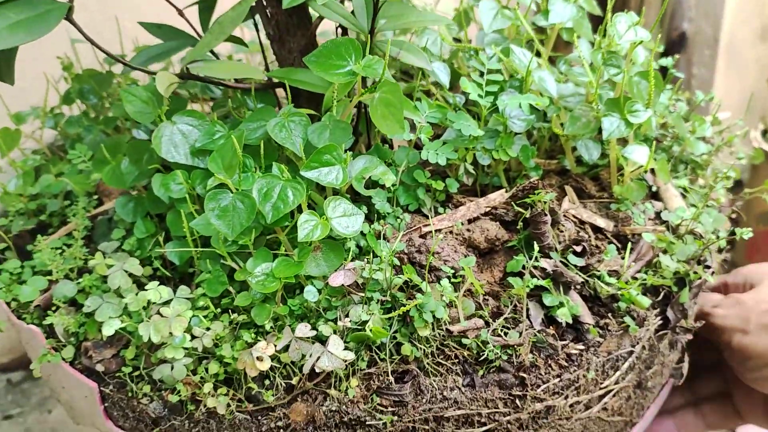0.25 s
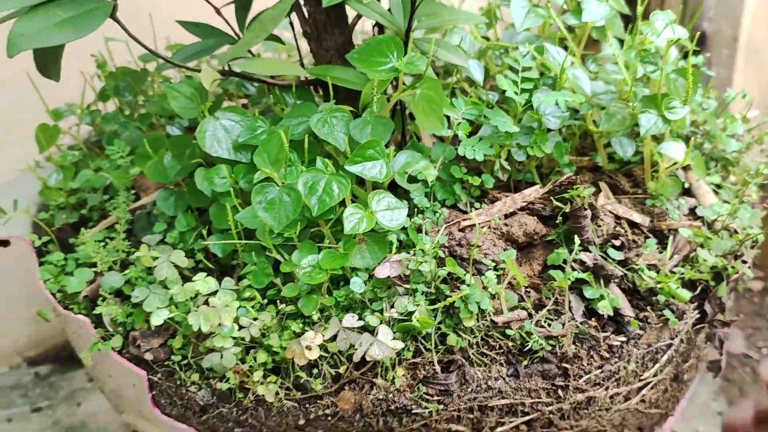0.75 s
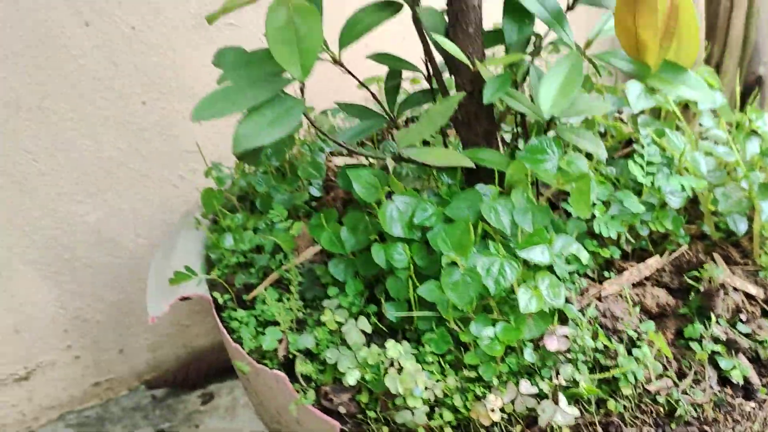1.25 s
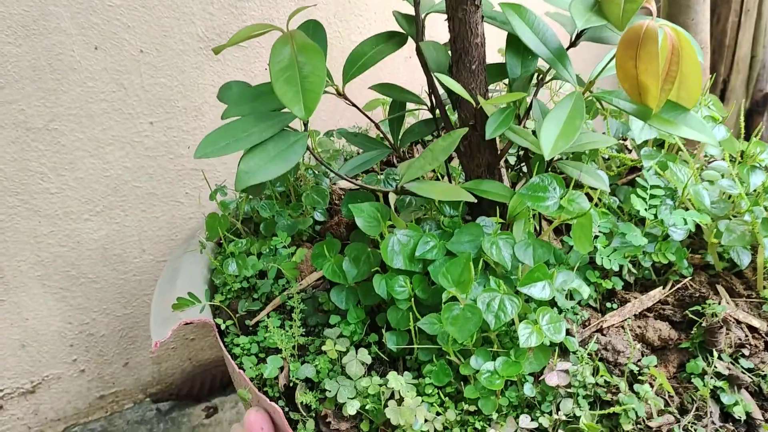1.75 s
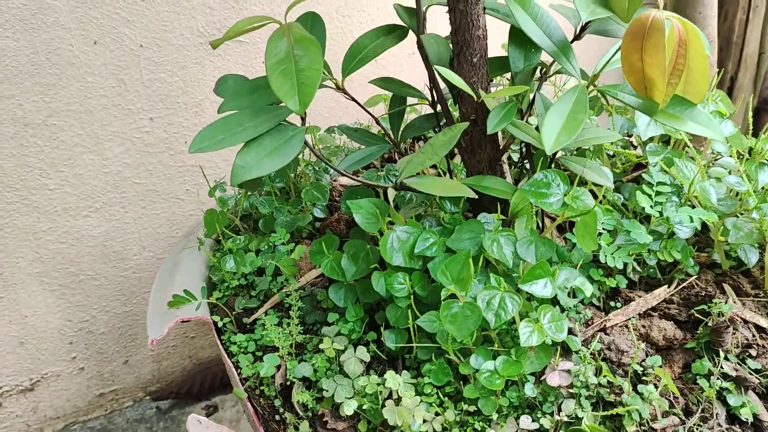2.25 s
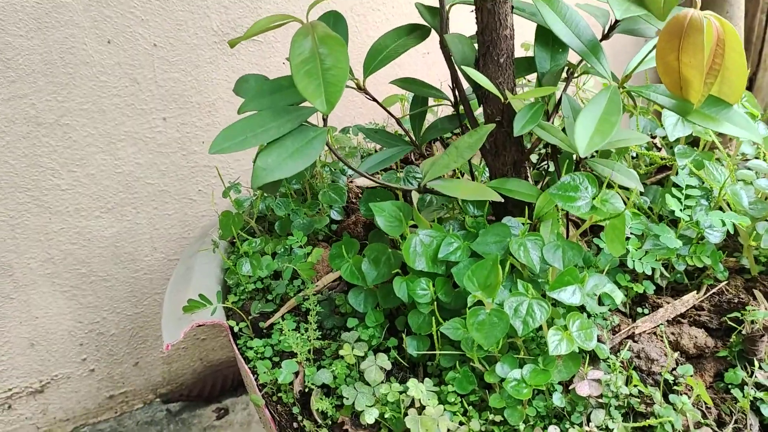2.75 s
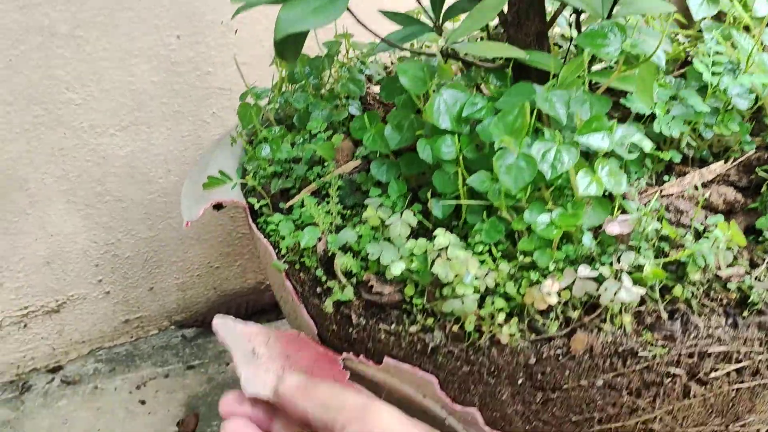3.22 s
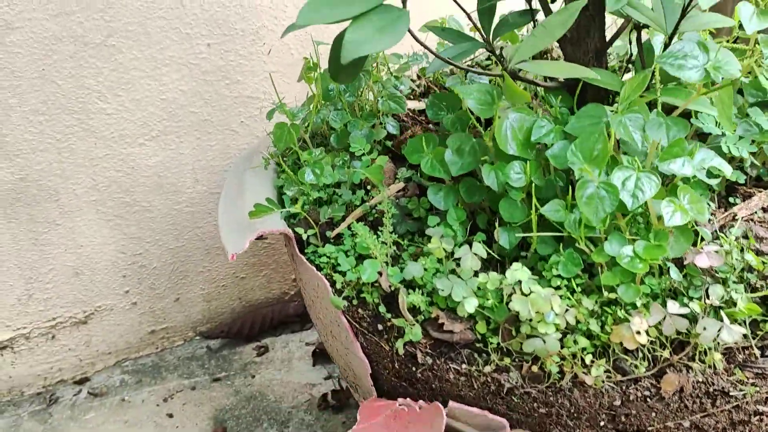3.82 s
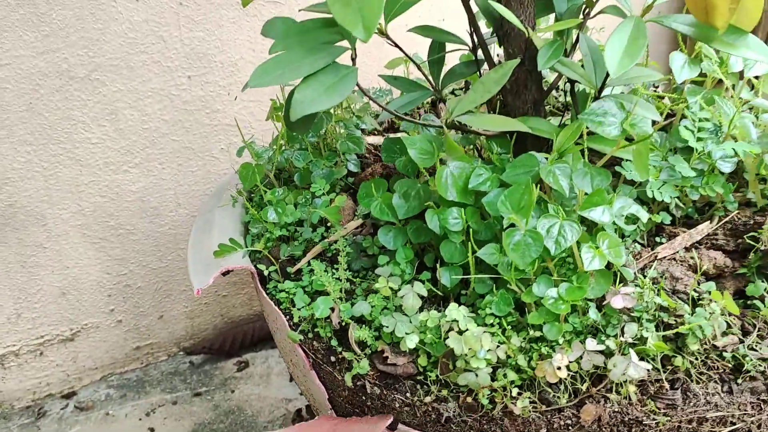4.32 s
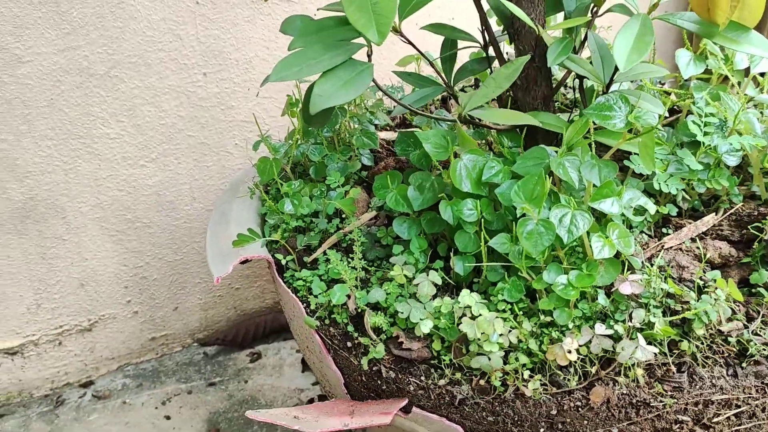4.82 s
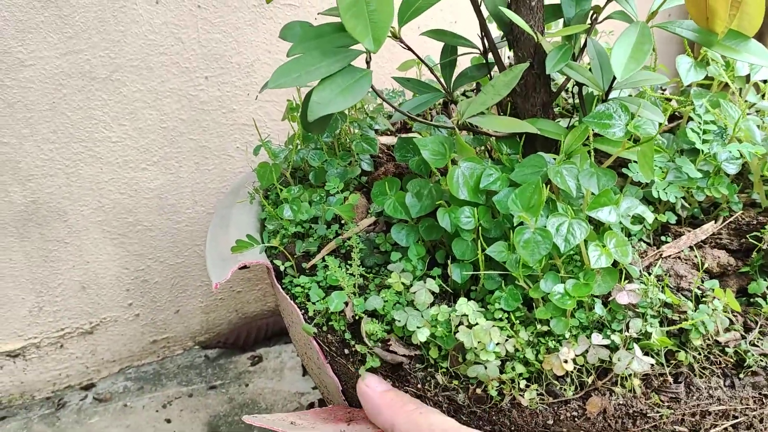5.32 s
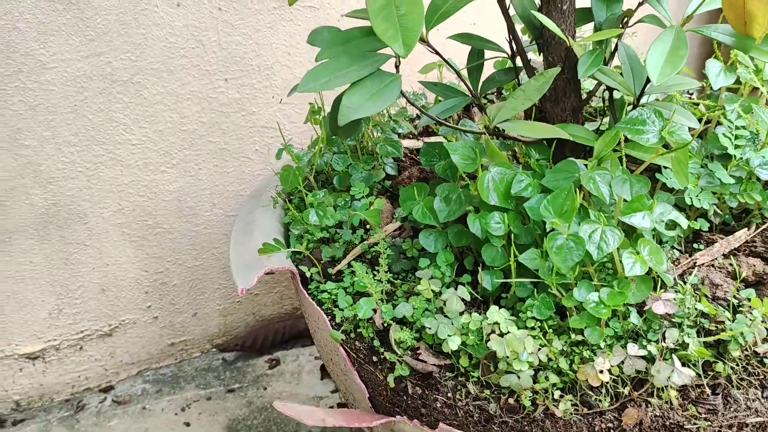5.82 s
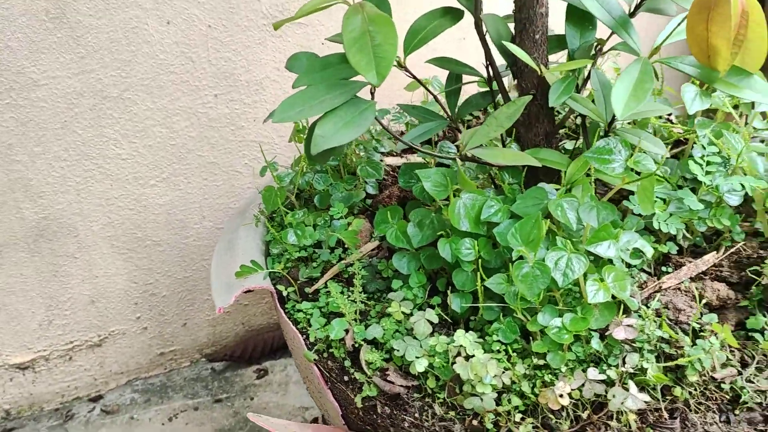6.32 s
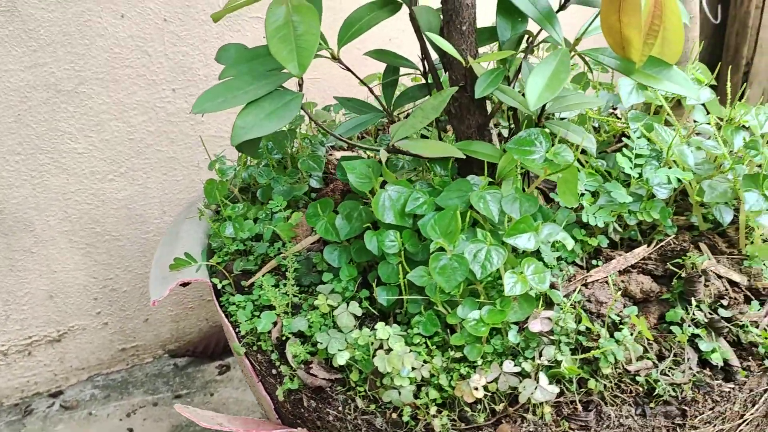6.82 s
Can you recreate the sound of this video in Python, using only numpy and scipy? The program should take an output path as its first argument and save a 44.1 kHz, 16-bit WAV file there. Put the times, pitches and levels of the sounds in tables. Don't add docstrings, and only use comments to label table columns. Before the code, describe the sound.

Quiet outdoor air, a thin cricket shimmer and a very faint sinking engine hum until about 1.6 s, with fingers softly brushing plastic, a dull small knock at 0.76 and high bird chips near 0.5, 0.7, 1.3 and 1.5. At 2.11 the brittle wall gives way: a very loud, ragged volley of dry cracks lasting about 0.06 s, with a scrape and short hollow thuds from the filled pot. A smaller snap follows at 2.55, then scraping. Light rubbing, ticks and knocks cluster at 3.6-4.05. A crisp double crack comes at 4.24, trailed by dragging; then faint handling. At 5.83 one last very loud, tight crack, a brief scrape, then tiny ticks and crumbs to 7 s. Distant roosters are barely audible from 2.3 s; bird chips recur sparsely. Short yard echo.

```python
import sys
import numpy as np
from scipy import signal
from scipy.io import wavfile

SR = 44100
rng = np.random.default_rng(int(sys.argv[2]) if len(sys.argv) > 2 else 0)


def gain_from_db(level_db):
    decades = np.asarray(level_db, float) / 20
    return 10 ** decades


def generate_wav(signal):
    frames = np.transpose(np.atleast_2d(signal))
    scaled = np.clip(frames, -1, 1) * 32767
    pcm = np.round(scaled).astype(np.int16)
    wavfile.write(sys.argv[1], SR, pcm)


N = 311346

# pitch_hz, level_db (per Hz)
AIR_LEVELS = [(15, 4), (82, 2), (151, -6.5), (217, -1.5), (337, -15.5), (555, -12), (1640, -26),
              (2930, -19.5), (4080, -41), (5600, -27), (7720, -30), (11000, -37.5), (15000, -35)]
# pitch_hz, likeness (0 to 1)
AIR_LIKENESS = [(25, 0.4), (80, .9), (250, 0.3), (1000, 0.01), (3000, 0.58), (10000, 0)]
AIR_DB = -60

# start_s, pitch_hz, level_db
ENGINE_HUM = [
    (0.0, 108.2, -74),
    (0.2, 109.2, -62.5),
    (0.42, 104, -67.5),
    (0.76, 104, -60.5),
    (0.9, 105, -67.5),
    (1.02, 95, -78),
    (1.09, 96, -60.5),
    (1.29, 92, -77),
    (1.6, 88, -71),
]
CRICKET_DB = -72.5

# peak_s, peak_db, rise_s, fall_s, dull_part_db
SCRAPES = [(0.0, -59.5, .01, 0.18, 1.5), (0.787, -53.5, 0.077, 0.036, -3),
           (2.164, -20.5, 0.017, .024, -6.5), (2.19, -41, .01, 0.12, 1), (2.36, -77, .1, 0.38, 10.5),
           (2.46, -61.5, 0.076, 0.11, -0.5), (2.563, -44.5, 0.026, 0.068, 2), (2.62, -48, 0.009, 0.012, 0),
           (2.861, -70, 0.063, 0.077, 4.5), (3.07, -73, 0.23, 0.16, 1), (4.258, -47, .01, 0.082, 4.5),
           (4.366, -43, 0.11, 0.038, 0), (4.42, -63, 0.017, 0.37, -3.5), (4.838, -65, 0.037, 0.0087, 5.5),
           (5.528, -53.5, 0.093, 0.12, -2.5), (5.42, -65, 0.13, 0.081, -17),
           (5.672, -60.5, 0.042, 0.072, 0.5), (5.847, -38.5, .01, 0.063, 0.5), (5.93, -60.5, .02, 0.094, 0),
           (6.27, -63.5, 0.16, .12, -9.5), (7.06, -69.5, 0.71, .01, -5.5)]
# peak_s, peak_db, rise_s, fall_s, bright_part_db
BRUSHES = [(0.68, -71.5, .5, 0.28, -20), (1.1, -74.5, 0.28, 0.087, -8), (1.35, -62, 0.19, 0.41, -5.5),
           (1.68, -63, 0.3, 0.18, -6), (1.949, -58, 0.019, 1, -4.5), (2.095, -53.5, 0.02, .006, -7),
           (3.369, -65.5, 0.28, 0.15, -6), (3.695, -47.5, 0.015, .025, -14), (3.757, -34, .02, 0.022, -9),
           (3.805, -47, 0.11, 0.044, -3.5), (3.84, -53, 0.12, 0.036, -7), (3.868, -50.5, .01, 0.06, -5),
           (3.945, -51, 0.031, 0.014, -11), (3.977, -56, 0.021, .012, -13), (4.004, -51, 0.0083, .006, -13),
           (4.04, -57, 0.049, 0.048, -4), (4.15, -67, 0.56, 0.15, -7), (4.92, -56.5, 0.019, 0.055, -5.5),
           (4.951, -53, 0.047, 0.015, -4), (5.168, -61, 0.024, 0.16, -11), (6.055, -59.5, 0.036, 0.032, 5),
           (6.342, -61.5, 0.1, .045, 2.5), (6.536, -61, 0.021, 0.077, -2.5), (6.668, -61, .04, .04, -10.5)]
SCRAPE_BRIGHT_DB, BRUSH_DULL_DB = -8.5, -4
STROKE_BEND = 1.51
REST_DB = -83.5

# start_s, peak_db, die_away_s (to -30 dB)
BIRD_CHIPS = [
    (0.5037, -42, 0.14),
    (0.7356, -44, 0.17),
    (1.265, -46, 0.39),
    (1.4894, -49, 0.16),
    (2.3521, -44, 0.26),
    (2.8998, -40.5, 0.11),
    (4.592, -44, 0.1),
    (5.3332, -45.5, 0.088),
    (6.1888, -52, 0.14),
]

# share_of_shard_pitch, level_db, die_away_s (to -60 dB)
SHARD_MODES = [(.5, -20, .009), (.7, -9, .009), (.84, -3, .009), (.93, -1, .01), (1.0, 0, .01),
               (1.1, -1, .009), (1.24, -4, .008), (1.45, -8, .007), (1.75, -12, .006)]
# share_of_thud_pitch, level_db, die_away_s (to -60 dB)
THUD_MODES = [(.5, -11, 0.03), (.87, -13, 0.038), (1.002, 8.5, 0.033), (1.14, -2.5, 0.028),
              (1.36, -3.5, .03), (1.629, -10, 0.022)]
# start_s, peak_db, thud_db (compared with peak), thud_hz, shard_hz
BREAKS = [(2.1085, -27.5, -13, 620, 3670), (2.1141, -14, -28, 860, 3460), (2.1156, 0.5, -15.5, 560, 2690),
          (2.1297, -8, -10, 573, 3940), (2.1312, 1, -14, 565, 2580), (2.1338, -6, -21, 1000, 2670),
          (2.1432, -11.5, -10, 877, 2920), (2.1447, -3.5, -11.5, 934, 2400), (2.155, -9, -9.5, 1000, 2437),
          (2.1584, -10, -13, 555, 3100), (2.166, -5, -20, 1143, 4700), (2.168, -7, -7, 562, 1488),
          (2.5466, -31, -17.5, 600, 2620), (2.547, -18, -15, 500, 5000), (2.5475, -8.5, -7, 934, 2390),
          (2.5492, -13.5, -4, 243.5, 3300), (4.2364, -30, -14, 600, 2600), (4.2387, -10, -5.5, 580, 2200),
          (4.2405, -8, -14, 590, 3320), (5.8291, -0.5, -20, 800, 2500), (5.8305, 0, -11, 597, 2970),
          (5.8327, -7.5, -9, 320, 3200)]
# start_s, peak_db, thud_db (compared with peak), thud_hz
KNOCKS = [(0.7614, -38, 4, 597), (0.7663, -36, -0.5, 580), (1.374, -42, -7, 900), (1.5944, -47.5, 3, 1040),
          (1.9463, -49, -3, 920), (2.2455, -32.5, -3, 895), (2.449, -43.5, -2, 550),
          (2.599, -36, -1.5, 920), (3.687, -25, -16, 600), (4.0111, -18, -11.5, 618),
          (4.7252, -51, -9.5, 1062), (4.807, -48.5, 3.5, 510), (4.8348, -53, -7, 794),
          (4.9222, -44, -13.5, 930), (5.5238, -39, 1.5, 740), (5.6014, -40, -22, 724),
          (6.4954, -40, -10, 950), (6.6362, -40, -12.5, 614)]
# start_s, peak_db, crack_db (compared with peak), shard_hz
TICKS = [(1.135, -44, -23, 2110), (1.4291, -41, 6, 3110), (2.5485, -17, -7.5, 5130),
         (2.6188, -28.5, -20, 1910), (3.6194, -39.5, 2.5, 2270), (3.728, -23, -7, 3100),
         (3.7444, -30, 6, 2150), (3.758, -21, 8, 2170), (3.8177, -39, 20, 3450), (3.8556, -35.5, 8, 3360),
         (3.943, -34, -21, 2730), (3.9648, -26.5, -1, 2400), (4.0364, -47, 7, 3290), (4.549, -45, 1, 3170),
         (5.8128, -41.5, -7, 2830), (6.527, -47.5, 15.5, 3900), (6.6607, -40.5, 5, 2110),
         (6.745, -47, 4, 2400), (6.7005, -57, 10, 4200), (6.7705, -48.5, 3.5, 3020),
         (6.8152, -50.5, 11, 2360)]
BREAK_CRACK_DB, CRACK_DB_PER_OCTAVE, MEAN_SHARD_HZ = -8, -2, 2560
KNOCK_CRACK_DB, KNOCK_SHARD_HZ = -11, 2400
TICK_THUD_DB, TICK_THUD_HZ = -12.5, 590
THUD_LATE_S = 0.00209
LEFT_TURN_HZ, RIGHT_TURN_HZ = 1500, 9500

# pitch_hz, level_db, die_away_s (to -60 dB)
YARD_ECHO = [(213, -33, 0.23), (480, -25, 0.11), (1000, -38, 0.17), (2200, -13, 0.05), (4770, -32, 0.058),
             (9000, -24.5, .09)]

# start_s, length_s, first_hz, last_hz, level_db
ROOSTER_NOTES = [(2.279, .3, 1325, 1335, -73.5), (2.945, 0.24, 1083, 1180, -74),
                 (3.187, .06, 1150, 1073, -71.5), (3.253, 0.26, 1053, 1155, -71),
                 (3.526, 0.14, 1150, 1046, -70), (3.53, .1, 1710, 1680, -76.5),
                 (4.249, .45, 1567, 1560, -75), (4.681, .13, 1056, 1050, -74), (5.58, .15, 1700, 1625, -79),
                 (6.109, .11, 1140, 1095, -74), (6.268, .39, 1637, 1650, -70.5),
                 (6.697, .34, 1615, 1600, -78.5)]
ROOSTER_SPLIT_HZ = 1250


def rms_one(x):
    return x / np.sqrt(np.mean(x ** 2) + 1e-20)


def peak_one(x):
    return x / np.max(np.abs(x))


def in_time(rows):
    s, *columns = np.transpose(rows)
    return [np.interp(np.arange(N) / SR, s, c) for c in columns]


def band(x, low_hz, high_hz, order=2):
    return signal.sosfilt(signal.butter(order, [low_hz, high_hz], "band", fs=SR, output="sos"), x)


def drift(rate_hz):
    r = np.exp(-80 * np.pi * rate_hz / SR)
    noise = rng.standard_normal(N // 40 + 2002)
    slow = signal.lfilter([1], [1, -2 * r, r * r], noise)[2000:]
    return np.interp(np.arange(N) / 40, np.arange(len(slow)), rms_one(slow))


def ring(clicks, hz, die_away_s):
    r = gain_from_db(-60 / (die_away_s * SR))
    w = 2 * np.pi * hz / SR
    return signal.lfilter([0, np.sin(w)], [1, -2 * r * np.cos(w), r * r], clicks + 1e-18)


def ring_modes(push, modes, base_hz):
    tones = [gain_from_db(db) * peak_one(ring(push, share * base_hz, die_away_s)) for share, db, die_away_s in modes]
    return peak_one(sum(tones))


def turn(x, hz):
    bend = np.tan(np.pi * hz / SR)
    pole = (bend - 1) / (bend + 1)
    return signal.lfilter([pole, 1], [1, pole], x)


def ports(x, own, pan_db):
    shared = np.array([turn(x, LEFT_TURN_HZ), turn(x, RIGHT_TURN_HZ)])
    return (shared + own) * gain_from_db([[pan_db / 2], [-pan_db / 2]])


def far_tone(rows, rough, fade_s):
    t = np.arange(N) / SR
    hz, db = in_time(rows)
    gate = np.clip(np.minimum(t - rows[0][0], rows[-1][0] - t) / fade_s, 0, 1)
    phase = 2 * np.pi * np.cumsum(hz) / SR
    both = []
    for port in range(2):
        level = np.sqrt(2) * gate * gain_from_db(db + 1.9 * drift(34))
        both.append(level * np.sin(phase + rough * drift(3.7)))
    return np.array(both)


def air(patchy_db):
    out = 0
    edges = 18 * 2 ** np.arange(0, 10.1, .5)
    white = rng.standard_normal((2, 2, N))
    for k, (low, high) in enumerate(zip(edges, edges[1:])):
        mid, side = band(white[k % 2], low, high)
        centre = np.log(low * high) / 2
        level_hz, levels = np.transpose(AIR_LEVELS)
        alike_hz, likeness = np.transpose(AIR_LIKENESS)
        level_db = np.interp(centre, np.log(level_hz), levels)
        alike = np.clip(np.interp(centre, np.log(alike_hz), likeness), -1, 1)
        both = np.sqrt(1 + alike) * mid + np.sqrt(1 - alike) * side * [[1], [-1]]
        out = out + gain_from_db(level_db + patchy_db * drift(18)) * both
    return gain_from_db(AIR_DB) * rms_one(out)


def engine():
    return far_tone(ENGINE_HUM, rough=0.18, fade_s=0.031)


def crickets():
    t = np.arange(N) / SR
    wander = 4.1 * np.array([drift(3), drift(17)])
    wings = np.clip(np.sin(2 * np.pi * 81 * t + wander) + 0.23, 0, 2)
    near = rms_one(wings * np.sin(2 * np.pi * 4645 * t + 2.84 * drift(23)))
    far = rms_one(ring(ring(rng.standard_normal((2, N)), 4620, 0.0027), 4675, 0.039))
    return gain_from_db(CRICKET_DB) * (near + 1.68 * far) * gain_from_db([[-1.2], [1.2]])


def strokes():
    t = np.arange(0, N + 32, 32) / SR
    power = np.full((3, len(t)), gain_from_db(2 * REST_DB))
    scrapes = [(*row, SCRAPE_BRIGHT_DB) for row in SCRAPES]
    brushes = [(*row[:4], BRUSH_DULL_DB, row[4]) for row in BRUSHES]
    for s, db, rise_s, fall_s, dull_db, bright_db in scrapes + brushes:
        away = np.maximum((s - t) / rise_s, (t - s) / fall_s)
        pressure_db = db - 20 * np.minimum(away, 9) ** STROKE_BEND
        power += gain_from_db(2 * pressure_db) * gain_from_db(2 * np.array([[0], [dull_db], [bright_db]]))
    return [np.interp(np.arange(N) / SR, t, np.sqrt(p)) for p in power]


def rub():
    middle, dull, bright = strokes()
    grain_size = np.minimum(rng.exponential(1, (3, N)), 5)
    grains = rng.standard_normal((3, N)) * gain_from_db(3.5 * grain_size) * [[1], [.7], [.7]]
    grains *= gain_from_db(1.8 * drift(110))
    sound = middle * rms_one(band(grains, 820, 3800, order=3))
    sound = sound + dull * rms_one(band(grains, 390, 1200))
    sound = sound + bright * rms_one(band(grains, 4000, 15000))
    return ports(sound[0], sound[1:], pan_db=-0.5)


def bird():
    t, envelope = np.arange(N) / SR, np.zeros(N)
    for s, db, die_away_s in BIRD_CHIPS:
        fall_db = 60 * np.clip(t - s, 0, 1) / (die_away_s * 2)
        envelope += (t > s) * gain_from_db(db - 18.0 - fall_db)
    voice = rms_one(band(rng.standard_normal((2, N)), 7050, 8000, order=3))
    return envelope * voice * gain_from_db([[-2.5], [2.5]])


def snap(thud_db, crack_db, thud_hz, shard_hz, run_s):
    t = np.arange(4096) / SR
    shape = (t / run_s) ** 0.35 * np.exp(-t / run_s)
    clicks = shape * rng.standard_normal((3, len(t))) * gain_from_db(1.3 * rng.exponential(1, (3, len(t))))
    clicks[1:] *= .55

    shard = ring_modes(clicks, SHARD_MODES, shard_hz)
    shard = peak_one(band(shard, 0.58 * shard_hz, 2.1 * shard_hz))

    late = np.interp(t - THUD_LATE_S, t, shape * rng.standard_normal(len(t)))
    push = signal.lfilter([1], [1, -.93], late)
    thud = ring_modes(push, THUD_MODES, thud_hz)

    tail = 0.3704 * (1 - np.exp(-t / run_s)) * gain_from_db(-60 * t / 0.0443)
    splinter = rng.standard_normal((3, len(t))) * (shape + tail)
    crack = peak_one(band(splinter * [[1], [.9], [.9]], 1700, 11000, order=1))

    body = shard + gain_from_db(crack_db - 2.5) * crack
    both = ports(body[0] + gain_from_db(thud_db + 5.0) * thud, body[1:], pan_db=-0.1)
    no_bass = signal.butter(4, 200, "high", fs=SR, output="sos")
    return signal.sosfilt(no_bass, both)


def fractures():
    events = []   # start_s, peak_db, thud_db, crack_db, thud_hz, shard_hz
    for s, db, thud_db, thud_hz, shard_hz in BREAKS:
        crack_db = BREAK_CRACK_DB + CRACK_DB_PER_OCTAVE * np.log2(shard_hz / MEAN_SHARD_HZ)
        events.append((s, db, thud_db, crack_db, thud_hz, shard_hz))
    for s, db, thud_db, thud_hz in KNOCKS:
        events.append((s, db, thud_db, KNOCK_CRACK_DB, thud_hz, KNOCK_SHARD_HZ))
    for s, db, crack_db, shard_hz in TICKS:
        events.append((s, db, TICK_THUD_DB, crack_db, TICK_THUD_HZ, shard_hz))
    out = np.zeros((2, N + 4096))
    for s, db, thud_db, crack_db, thud_hz, shard_hz in events:
        at = round((s - .0004) * SR)
        run_s = 0.0011 * gain_from_db(0.081 * db)
        out[:, at:at + 4096] += gain_from_db(db - 2.33) * snap(thud_db, crack_db, thud_hz, shard_hz, run_s)
    return out[:, :N]


def yard(x):
    t = np.arange(12000) / SR
    white = rng.standard_normal((2, len(t))) * (1 - np.exp(-t / 0.0044))
    echo = 0
    for hz, db, die_away_s in YARD_ECHO:
        noise = rms_one(band(white, hz / 1.5, hz * 1.96))
        echo = echo + gain_from_db(db - 32.5) * gain_from_db(-60 * t / die_away_s) * noise
    echo[1] = 2.2 * echo[0] + 2.9 * echo[1]
    return signal.fftconvolve(x, echo, axes=1)[:, :N]


def roosters():
    low_bird = [note for note in ROOSTER_NOTES if note[2] < ROOSTER_SPLIT_HZ]
    high_bird = [note for note in ROOSTER_NOTES if note[2] >= ROOSTER_SPLIT_HZ]
    out = 0
    for notes in (low_bird, high_bird):
        path = []
        for s, length, hz, end_hz, db in notes:
            end = s + length
            path += [(s, hz, db - 31.5), (s + .008, hz, db)]
            path += [(end - .008, end_hz, db), (end, end_hz, db - 27)]
        out = out + far_tone(path, rough=2.5, fade_s=0.011)
    return out


def scene():
    pot = fractures()
    near = pot + yard(pot) + rub()
    far = air(patchy_db=3.0) + engine() + crickets() + bird() + roosters()
    return near + far


def roll_off(x):
    return signal.sosfilt(signal.butter(12, 16380, fs=SR, output="sos"), x)


def record(dry):
    rounded = np.tanh(dry)
    step = signal.sosfilt(signal.ellip(6, .5, 24, 14250, fs=SR, output="sos"), rounded)
    mix = signal.sosfilt(signal.cheby2(10, 60, 16500, fs=SR, output="sos"), step)
    return roll_off(mix)


dry = scene()
out = record(dry)
generate_wav(out)
```